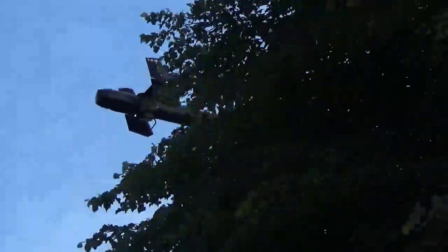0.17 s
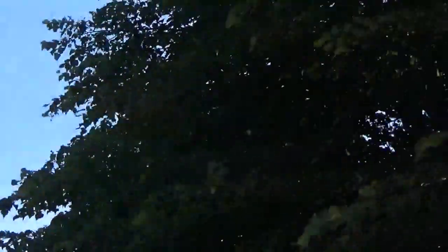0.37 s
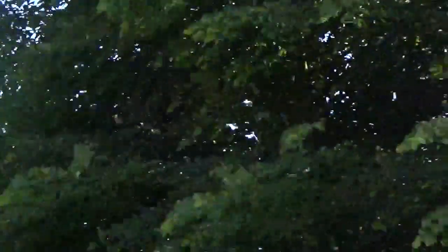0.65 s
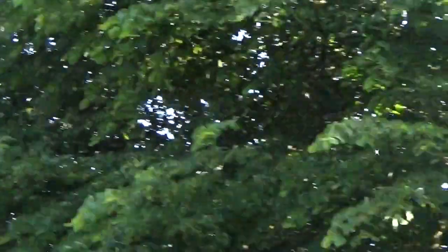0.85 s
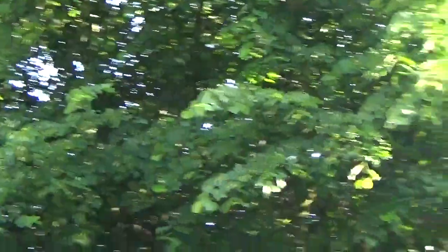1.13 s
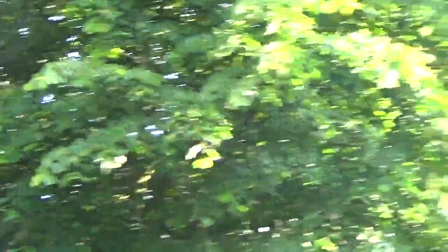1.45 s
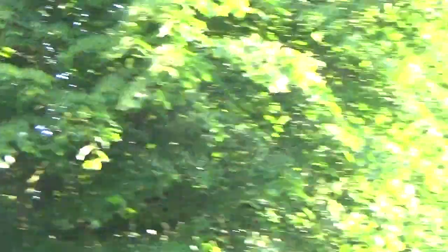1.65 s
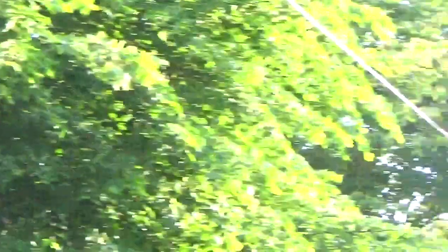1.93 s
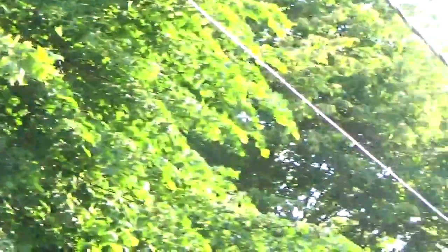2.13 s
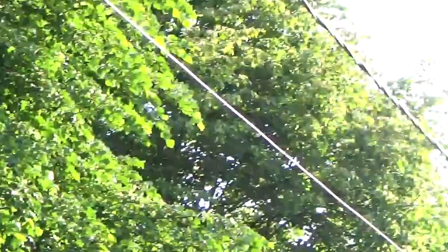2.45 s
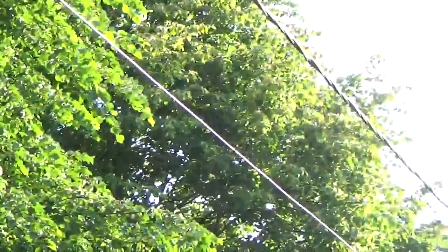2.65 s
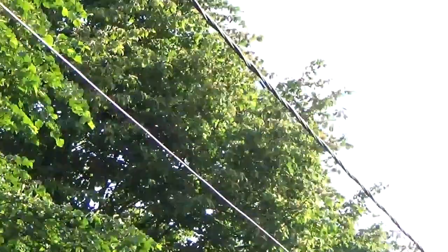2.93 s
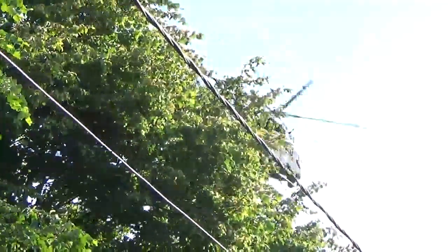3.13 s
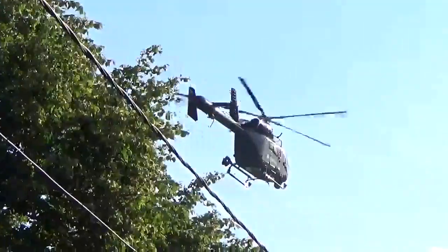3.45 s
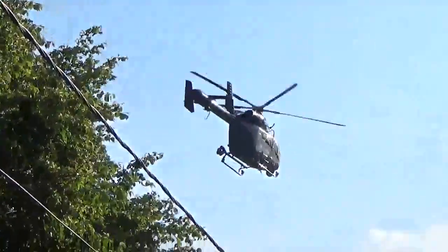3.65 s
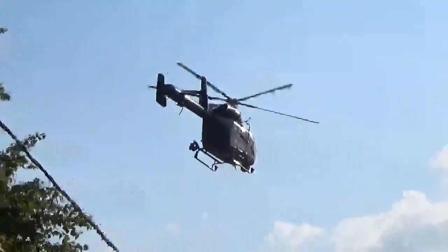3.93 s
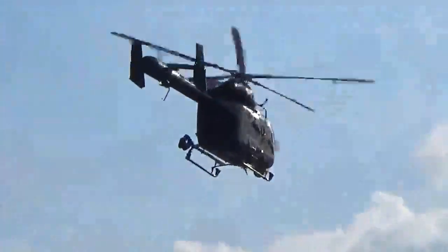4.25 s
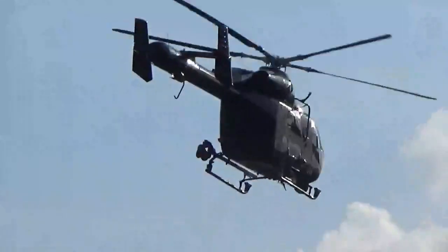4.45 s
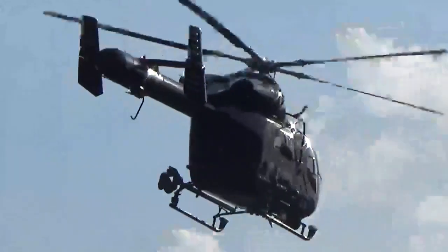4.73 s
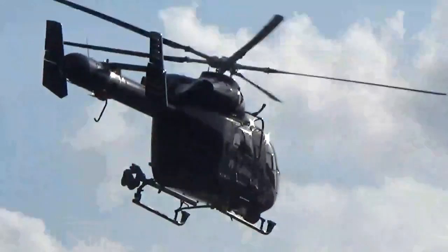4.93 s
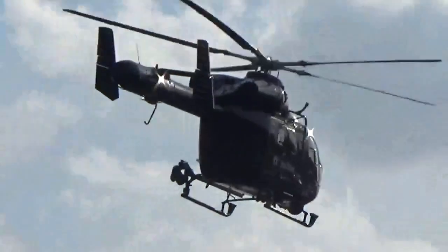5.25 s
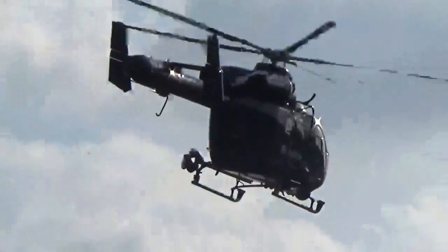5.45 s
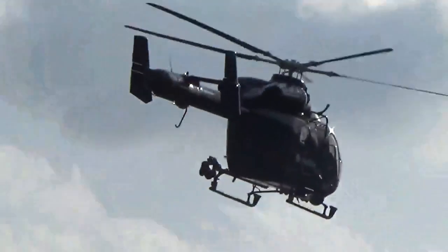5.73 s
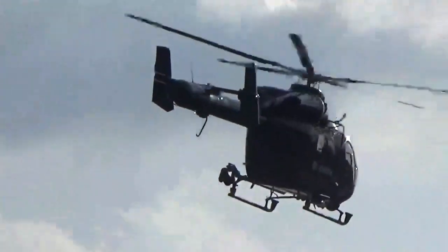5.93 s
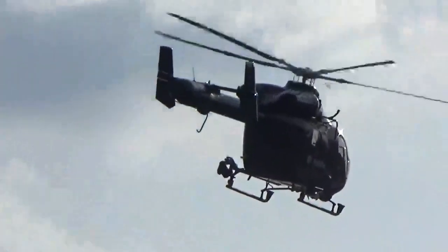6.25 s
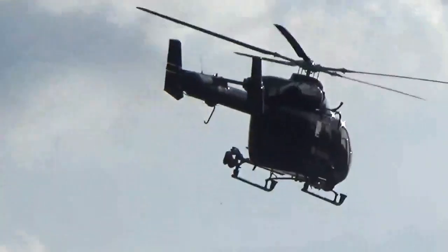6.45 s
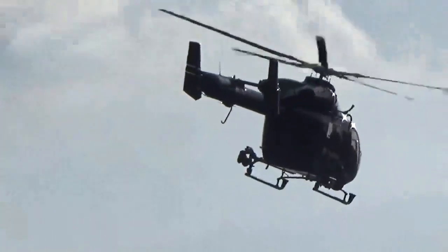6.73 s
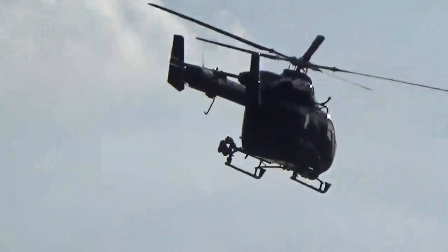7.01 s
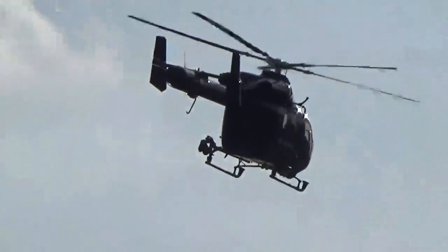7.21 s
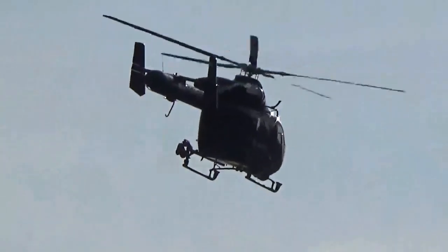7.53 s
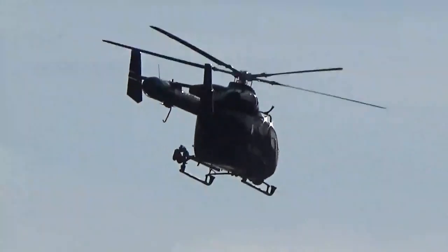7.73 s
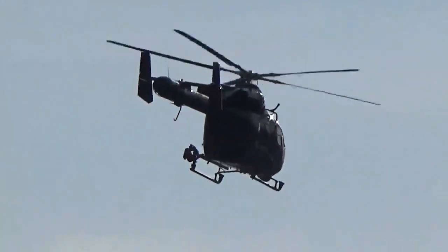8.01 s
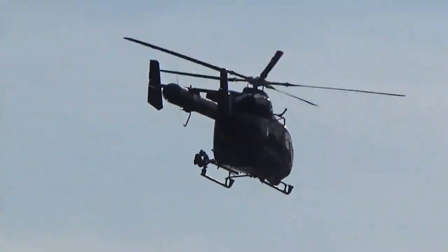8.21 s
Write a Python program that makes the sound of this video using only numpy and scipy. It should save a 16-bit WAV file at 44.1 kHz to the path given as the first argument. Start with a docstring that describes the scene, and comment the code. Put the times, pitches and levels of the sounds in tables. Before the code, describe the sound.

A helicopter passes overhead and flies away, its pulsing rotor wash and turbine roar fading under a wavering, slowly sinking whine.

```python
"""A twin-turbine helicopter passes overhead: rotor wash, exhaust roar and jet hiss pulse with the blades
under the whine of a ducted tail fan. As it goes behind trees, foliage screens the treble and scatters
the sound, the ground echo sweeps a comb through the roar, and the whine sinks by the Doppler effect.
Near 5 s a short echo briefly hollows the noise, and at 6.4 s comes one soft low thump. At last the
helicopter is far away, its tones wavering in restless air above a low rumble."""
import sys
import numpy as np
from scipy import signal
from scipy.fft import rfft, irfft, next_fast_len
from scipy.io import wavfile
from scipy.ndimage import uniform_filter1d

SR = 44100
rng = np.random.default_rng(int(sys.argv[2]) if len(sys.argv) > 2 else 0)


def int16_out(signal):
    """Quantize to a 16-bit WAV file."""
    q = np.round(np.clip(np.atleast_2d(signal).T, -1, 1) * 32767)
    wavfile.write(sys.argv[1], SR, q.astype(np.int16))


N = 369116
TIME = np.arange(N) / SR

# The noise fades with distance, and foliage screens its treble: t/s, body level/dB, treble level/dB
FLIGHT_LEVELS = [(0, -25.5, -26.5), (.15, -25, -28.5), (.55, -23.5, -40.5), (.75, -24.5, -46),
                 (1.45, -28, -49.5), (1.9, -26, -53), (2.8, -28, -54.5), (2.96, -27.5, -47.5),
                 (3.2, -28, -47), (3.3, -30.5, -46.5), (3.42, -30.5, -44.5), (3.72, -31, -40),
                 (3.85, -32.5, -44.5), (4.2, -33.5, -48.5), (4.33, -34.5, -45.5), (4.7, -35.5, -49),
                 (4.88, -40, -53.5), (5.56, -40.5, -57.5), (5.64, -38.5, -51.5), (6.0, -40, -57),
                 (6.85, -40, -58), (7.02, -39, -56), (7.5, -44.5, -66), (8.37, -45, -67.5)]
# How each airflow noise follows those levels: name -> base level/dB, share of body, share of treble
AIRFLOW_MIX = {"wash": (-34, 1.086, -0.025), "roar": (-36.5, 0.97, 0.046), "rush": (-41, 0.27, 0.54),
               "hiss": (-53.5, 0, 1.046)}
# Swing of the balance between exhaust and rotor: t/s, rise of roar and fall of wash/dB
ROAR_OVER_WASH = [(0, -.5), (1.1, 0), (4.3, 0.5), (4.65, 1), (5.6, 1.5), (5.85, -0.3), (7.0, 3.2),
                  (7.5, 0.5), (8.0, 0), (8.25, 1.5), (8.37, 0.5)]
# Spectra of the turbulent sources: f/Hz, relative level/dB
WASH_SPECTRUM = [(40, -56), (100, -21.5), (150, -21.5), (200, -12.5), (250, -10), (330, 0), (420, -7),
                 (520, -2.5), (600, 3), (740, -1.5), (950, -4.5), (1200, -8.5), (1700, -25.5),
                 (4000, -48.5)]
ROAR_SPECTRUM = [(400, -30), (800, -4), (1050, 1.5), (1220, 0.5), (1380, 2.5), (1560, 3), (1780, -1.5),
                 (2000, -3), (2300, -3.5), (3000, -11.5), (5000, -60)]
RUSH_SPECTRUM = [(1200, -21.5), (2000, 2), (2600, -1), (3300, -1), (4400, -6.5), (5500, -12), (7000, -18),
                 (11000, -41.5)]
HISS_SPECTRUM = [(2500, -12), (4500, 4.5), (5800, 0.5), (7000, 1), (8800, 3.5), (9800, 1), (11000, -7.5)]
RUMBLE_SPECTRUM = [(30, -25), (70, -14), (100, -5), (150, -8.5), (215, 2), (260, -1), (330, 10),
                   (420, -0.5), (700, -2.5), (2000, -54)]
# The fan's blade-passing frequency sinks as the helicopter turns away: t/s, f/Hz
FAN_PITCH = [(0, 1169), (.7, 1155), (1.4, 1141), (2, 1135), (2.7, 1132), (3.1, 1126), (3.6, 1120),
             (4.5, 1115), (5.7, 1109), (7, 1103), (8.37, 1095)]
# The fan beams harmonics 1 to 4 in lobes that sweep past the listener: t/s, level/dB
FAN_LOBES_1 = [(0, -32), (.15, -41), (.45, -37), (.9, -40), (1.4, -40), (1.78, -28.5), (2.05, -30),
               (2.35, -34), (2.6, -30.5), (2.8, -30), (3.05, -28.5), (3.22, -33), (3.35, -45),
               (3.65, -28.5), (3.78, -31.5), (3.85, -43), (4.0, -37), (4.16, -31), (4.3, -34.5),
               (4.45, -32.5), (4.62, -40.5), (5.0, -46.5), (5.5, -52), (5.91, -46.5), (6.26, -50),
               (6.61, -42), (7.0, -42.5), (7.55, -45.5), (7.9, -49.5), (8.13, -46), (8.37, -49.5)]
FAN_LOBES_2 = [(0, -37), (.15, -33), (.32, -40), (.66, -30), (.85, -39), (1.05, -35.5), (1.18, -38.5),
               (1.4, -41.5), (1.6, -35), (1.9, -32), (2.2, -41), (2.55, -34), (2.72, -42), (3.12, -31.5),
               (3.22, -31), (3.45, -31.5), (3.5, -40), (3.56, -31.5), (3.7, -34.5), (3.9, -34.5),
               (4.05, -43), (4.25, -39), (4.65, -33.5), (5.05, -45.5), (5.4, -44), (5.67, -33.5),
               (5.87, -39.5), (6.18, -44), (6.4, -36.5), (6.7, -31), (6.85, -36), (7.0, -31.5),
               (7.2, -40.5), (7.42, -38.5), (7.56, -45.5), (7.76, -42.5), (7.95, -52.5), (8.37, -45)]
FAN_LOBES_3 = [(0, -40), (.65, -44), (1.2, -46), (2.7, -51.5), (3.1, -44), (3.45, -53), (3.8, -34),
               (3.88, -46), (3.95, -34), (4.04, -59), (4.14, -47), (4.5, -51), (5.16, -57), (5.83, -51),
               (6.15, -58), (6.66, -59), (7.0, -49), (7.2, -50), (7.4, -50.5), (7.86, -62), (8.36, -51)]
FAN_LOBES_4 = [(0, -52), (.22, -38), (.6, -53), (1.3, -49), (1.8, -63), (2.7, -66), (3.1, -59), (3.78, -51),
               (3.93, -41), (4.08, -53), (4.6, -53), (5.1, -65), (7, -61), (8.37, -64)]
# Line shape of each fan harmonic: gain/dB, spread/Hz, relative amplitude of the frayed skirt
FAN_LINES = [(0.3, 9, 0.28), (0, 17, 0.3), (0.5, 26, 0.55), (0, 40, 0.6)]
# The lowest tone breaks up with distance; the octave clears a while: t/s, wavering share of harmonics 1-4
FAN_BREAKUP = [(0, .1, .6, .8, .8), (3.2, .04, .7, .9, .8), (4.4, .45, .65, .75, .7),
               (5.3, .6, .65, .9, .8), (6.3, .65, .12, .8, .7), (7.3, .7, .15, .85, .8),
               (8.37, .7, .75, .9, .8)]
# The rotor chops the fan's intake air: t/s, level/dB re the fundamental at -2, -1, +1, +2 blade rates
FAN_SIDEBANDS = [(0, -20, -20, -18, -22), (1.7, -22, -22, -14, -18), (2.15, -22, -22, -6, -11),
                 (2.7, -22, -22, -12, -13), (3.7, -20, -20, -17, -22), (5, -14, -12, -7, -14),
                 (5.7, -10, -9, 0, -10), (7, -9, -6.5, -1, -7), (8.37, -7, -5.5, -1, -8)]
# Brief swells in the helicopter's noise, low, middle and high: t/s, half length/s, centre f/Hz, level/dB
SWELLS = [(0.445, 0.18, 920, -23), (1.16, 0.1, 337, -28), (1.394, 0.027, 334, -28),
          (1.596, 0.028, 332, -31), (1.877, 0.033, 630, -24), (2.31, 0.13, 660, -28.5),
          (2.476, 0.051, 630, -26), (2.717, 0.32, 680, -35), (3.02, 0.042, 680, -25),
          (4.62, .12, 1530, -41), (5.15, 0.11, 1570, -43.5), (5.61, .08, 1480, -37.5)]
# Band of one swell: multiple of its centre frequency, relative level/dB
SWELL_SPECTRUM = [(.45, -54), (.72, -19), (.88, 0.5), (1.14, 2.5), (1.42, -13), (2.4, -55)]
# The gearbox tone comes and goes: t/s, level/dB
GEAR_LEVEL = [(0, -40), (.7, -42), (1.15, -33), (1.6, -44), (3.0, -45), (3.3, -34.5), (3.6, -45),
              (4.2, -45), (4.6, -62), (5.1, -56), (5.55, -43.5), (6.3, -52), (7.0, -56), (7.5, -66),
              (8.37, -57)]
# Harmonics of the blades' thud: multiple of the blade rate, relative level/dB
THUD_HARMONICS = [(1, -41.5), (2, -3), (3, -5.5), (4, -1), (5, -1)]
# Reflection from the ground: t/s, strength (0-1), treble gloss (0-1)
GROUND_REFLECTION = [(0, 0.34, 0.05), (2.4, 0.6, 0.2), (4.1, 0.55, 0.7), (5.1, 0.17, 1), (5.8, 0.3, 0.8),
                     (7, 0, .5), (8, 0.2, 0.1)]
# Spectra of the scattered sound and of its low reverberation: f/Hz, gain/dB
SCATTER_SPECTRUM = [(60, -20), (180, -23), (330, -23.5), (630, -19.5), (1130, -16.5), (2000, -18),
                    (3600, -15), (6000, -10), (9000, -14)]
REVERB_SPECTRUM = [(20, -12), (60, -7), (100, -5), (160, 2), (230, -10), (330, -7), (450, -11), (650, -24),
                   (1500, -22)]
# Low reverberation is strong only while the helicopter is close above the trees: t/s, gain/dB
REVERB_GAIN = [(0, -0.5), (1.5, -1.5), (2.7, -5.5), (3.6, -9), (5, -29), (8.37, -31)]
# Stereo balance: t/s, left minus right level/dB
BALANCE = [(0, -0.3), (3, -1), (4.5, -0.1), (6.5, 0), (8.37, 0.6)]


def airflow(blade):
    """Turbulent flow radiates broadband noise: rotor wash, exhaust roar, the turbines' rush and hiss."""
    wash = over_ground(turbulence(WASH_SPECTRUM, blade, chop=0.022, flutter_db=0.05, flutter_rate=24))
    roar = over_ground(turbulence(ROAR_SPECTRUM, blade, chop=0.082, flutter_db=0.78, flutter_rate=16))
    rush = over_ground(turbulence(RUSH_SPECTRUM, blade, chop=0.11, flutter_db=1.0, flutter_rate=20))
    hiss = turbulence(HISS_SPECTRUM, blade, chop=0.074, flutter_db=1.1, flutter_rate=24)
    return (unit_in_band(wash, (480, 1050)) * undb(airflow_db("wash"))
            + unit_in_band(roar, (1250, 2050)) * undb(airflow_db("roar"))
            + unit_in_band(rush, (2600, 4300)) * undb(airflow_db("rush"))
            + unit_in_band(hiss, (6500, 10500)) * undb(airflow_db("hiss")))


def turbulence(spectrum, blade, chop, flutter_db, flutter_rate):
    """Amplitude modulation: noise swells at each blade passage and flutters in restless air."""
    pulse = 1 + chop * np.cos(blade) + chop / 2 * np.cos(2 * blade)
    return colour(rng.standard_normal(N), spectrum) * pulse * undb(flutter_db * walk(flutter_rate))


def airflow_db(name, rush_db_per_s=0.73):
    """Distance, screening and directivity set the level of one airflow noise along the flight."""
    body_db, treble_db = (level - level.mean() for level in curves(FLIGHT_LEVELS))
    base_db, body_share, treble_share = AIRFLOW_MIX[name]
    lean_db = curves(ROAR_OVER_WASH)[0]
    turn_db = rush_db_per_s * (TIME - TIME.mean())  # the exhausts turn towards the listener
    aspect_db = {"wash": -lean_db, "roar": lean_db, "rush": turn_db, "hiss": 0}
    return base_db + body_share * body_db + treble_share * treble_db + aspect_db[name]


def tail_fan(fan, blade, fading_db=1.0):
    """Blade-passing harmonics, broadened by intake turbulence; rotor modulation adds sidebands."""
    lobes = (FAN_LOBES_1, FAN_LOBES_2, FAN_LOBES_3, FAN_LOBES_4)
    levels_db = [curves(lobe)[0] + fading_db * walk(11) for lobe in lobes]  # each fades in restless air
    shares = curves(FAN_BREAKUP)
    whine = np.zeros(N)
    for k, (gain_db, spread_hz, fray) in enumerate(FAN_LINES):
        core = wavering((k + 1) * fan, shares[k], spread_hz)
        skirt = wavering((k + 1) * fan, share=1, spread_hz=55)
        whine += undb(levels_db[k] + gain_db) * (core + fray * skirt)
    for offset, side_db in zip((-2, -1, 1, 2), curves(FAN_SIDEBANDS)):
        sideband = wavering(fan + offset * blade, share=.65, spread_hz=8)
        whine += undb(levels_db[0] + side_db) * sideband
    return whine


def wavering(phase, share, spread_hz):
    """Multipath fading: a steady tone plus a part of random size and phase, level in the long run."""
    in_phase, quadrature = (unit(walk(2 * spread_hz) + 0.84 * walk(7 * spread_hz)) for _ in range(2))
    paths = np.sqrt(2 - 2 * share) + np.sqrt(share) * (in_phase + 1j * quadrature)
    power = uniform_filter1d(np.abs(paths) ** 2, size=SR // 8)
    return np.real(paths * np.exp(1j * phase)) * np.sqrt(2 / power)


def swells(blade):
    """Amplitude modulation: brief band-limited swells in the helicopter's noise throb at the blade rate."""
    air = turbulence([(100, 0), (5000, 0)], blade, chop=0.3, flutter_db=0.5, flutter_rate=18)
    noise = np.zeros(N)
    for at, half_length, hz, db in SWELLS:
        band = colour(air, [(hz * ratio, gain_db) for ratio, gain_db in SWELL_SPECTRUM])
        noise += unit(band) * undb(db) * bell(at, half_length)
    return over_ground(noise)


def machinery(fan, gear_ratio=1.207, compressor_ratio=5.09):
    """Coupled shafts keep fixed frequency ratios: smeared tones of the gearbox and a faint compressor."""
    gear = undb(curves(GEAR_LEVEL)[0]) * wavering(gear_ratio * fan, share=0.53, spread_hz=16)
    compressor_db = airflow_db("rush") + np.linspace(-14.5, -24, N)
    return gear + undb(compressor_db) * wavering(compressor_ratio * fan, share=0.86, spread_hz=150)


def rumble(blade, db=-49):
    """Low frequencies carry far: rotor noise that fills the neighbourhood and keeps its level."""
    return unit(turbulence(RUMBLE_SPECTRUM, blade, chop=0.078, flutter_db=1.0, flutter_rate=6)) * undb(db)


def rotor_thud(blade, waver_db=3.5):
    """Periodic blade passage gives a harmonic series, which fades more slowly than the wash."""
    thud = np.zeros(N)
    for harmonic, db in THUD_HARMONICS:
        amplitude = undb(db + waver_db * walk(4.9))
        thud += amplitude * np.cos(harmonic * blade + rng.uniform(0, 2 * np.pi))
    return unit(thud) * undb(-46 + 0.55 * airflow_db("wash"))


def over_ground(x, overhead_s=.5, overhead_lag_s=.0038, height_over_speed_s=4.0):
    """Comb filtering: the ground echo lags most overhead and is brightest around 5 s."""
    strength, gloss = curves(GROUND_REFLECTION)
    dull, bright = treble_loss(x, 1400), treble_loss(x, 3000)
    sine_of_elevation = 1 / np.hypot(1, (TIME - overhead_s) / height_over_speed_s)
    echo = np.interp(TIME - overhead_lag_s * sine_of_elevation, TIME, dull + gloss * (bright - dull))
    return (x + strength * echo) / np.sqrt(1 + strength ** 2)


def edge_echo(x, lag_s=.00106):
    """Interference with an inverted echo, as from a nearby edge, briefly hollows the noise."""
    strength = .3 * bell(at_s=4.9, half_length_s=.5)
    echo = np.interp(TIME - lag_s, TIME, treble_loss(x, 3600))
    return (x - strength * echo) / np.sqrt(1 + strength ** 2)


def trees(x, t60_s=0.15, paths=4):
    """Scattering: leaves and trunks return a diffuse copy along paths that change as the source moves."""
    t = TIME[:SR // 2]
    diffuse = np.zeros(N)
    for _ in range(paths):
        tail = rng.standard_normal(len(t)) * np.exp(-np.log(1000) * t / t60_s)
        path_phase = 2 * np.pi * (rng.uniform(1, 8.9) * TIME + rng.uniform())
        diffuse += np.cos(path_phase) * signal.fftconvolve(x, tail / np.linalg.norm(tail))[:N]
    return diffuse * np.sqrt(2 / paths)


def thump(at_s=6.365, hz=70, db=-50):
    """A low tone burst only a few cycles long is heard as one soft thump."""
    return undb(db) * bell(at_s, half_length_s=0.021) * np.sin(2 * np.pi * hz * (TIME - at_s))


def undb(db):
    """Amplitude ratio of a level in decibels."""
    return np.exp(np.asarray(db) * (np.log(10) / 20))


def curves(table):
    """Linear interpolation of each column of a timed table, sample by sample."""
    times, *columns = np.transpose(table)
    return [np.interp(TIME, times, column) for column in columns]


def bell(at_s, half_length_s):
    """Gaussian envelope with peak 1."""
    return np.exp(-((TIME - at_s) / half_length_s) ** 2)


def unit(x):
    """Normalisation to rms 1."""
    return x / np.sqrt(np.mean(np.abs(x) ** 2))


def unit_in_band(x, band_hz):
    """Normalisation to rms 1 within a band."""
    band = signal.sosfilt(signal.butter(4, band_hz, "band", fs=SR, output="sos"), x)
    return x / np.std(band)


def colour(x, spectrum):
    """Spectral shaping by points of f/Hz, gain/dB, joined on a logarithmic frequency axis."""
    size = next_fast_len(N + 4096)
    hz, db = np.transpose(spectrum)
    f = np.maximum(np.fft.rfftfreq(size, 1 / SR), 1)
    gain = undb(np.interp(np.log(f), np.log(hz), db))
    return irfft(rfft(x, size) * gain, size)[:N]


def treble_loss(x, hz):
    """Zero-phase low-pass: filtering forwards and backwards adds no delay."""
    sos = signal.butter(2, hz, fs=SR, output="sos")
    return signal.sosfilt(sos, signal.sosfilt(sos, x)[::-1])[::-1]


def walk(rate):
    """Smooth random process of spread 1 that changes about rate times a second."""
    knots = rng.standard_normal(size=4096)
    path = uniform_filter1d(np.repeat(knots, 4), size=5)
    return np.interp(TIME * rate * 4, np.arange(len(path)), path / path.std())


def scene(fan_per_blade=35.9):
    """One gearbox turns fan and rotor, so both share the same Doppler fall."""
    fan = 2 * np.pi * np.cumsum(curves(FAN_PITCH)[0]) / SR  # blade-passing phase/rad of the tail fan
    blade = fan / fan_per_blade  # and of the main rotor
    direct = (edge_echo(airflow(blade)) + swells(blade) + rumble(blade) + rotor_thud(blade)
              + tail_fan(fan, blade) + machinery(fan))
    diffuse = trees(direct)
    reverberation = colour(diffuse, REVERB_SPECTRUM) * undb(curves(REVERB_GAIN)[0])
    side = colour(diffuse, SCATTER_SPECTRUM) + reverberation  # reaches left and right unalike
    balance_db = curves(BALANCE)[0]
    left = (direct + side) * undb(balance_db / 2)
    right = (direct - side) * undb(-balance_db / 2)
    return np.array([left, right]) + thump()


def record(dry, cutoff_hz=11050):
    """Band limiting: an elliptic low-pass cuts the top steeply."""
    return signal.sosfilt(signal.ellip(12, .1, 80, cutoff_hz, fs=SR, output="sos"), dry)


dry = scene()
out = record(dry)
int16_out(out)
```